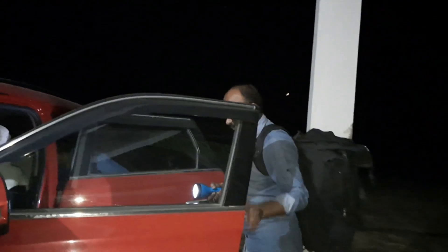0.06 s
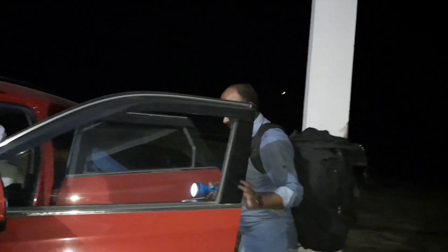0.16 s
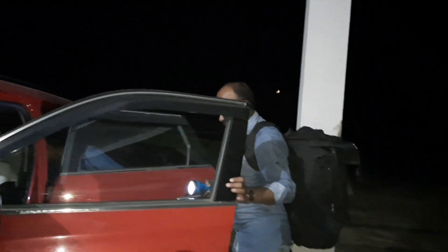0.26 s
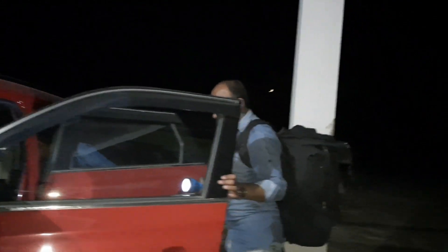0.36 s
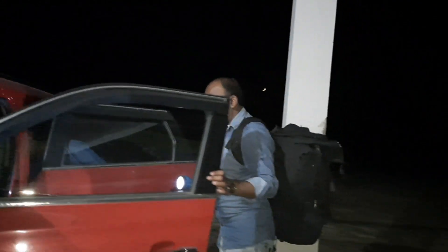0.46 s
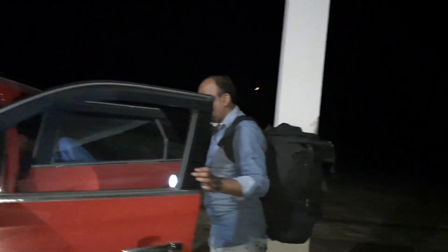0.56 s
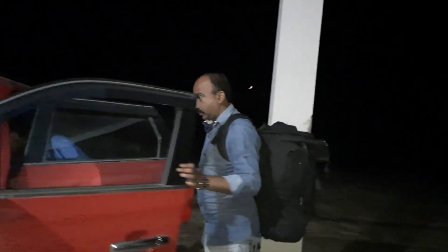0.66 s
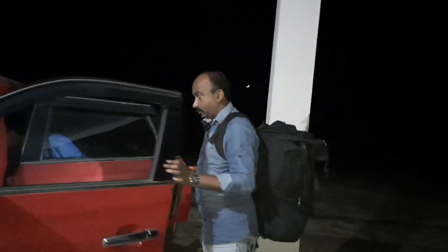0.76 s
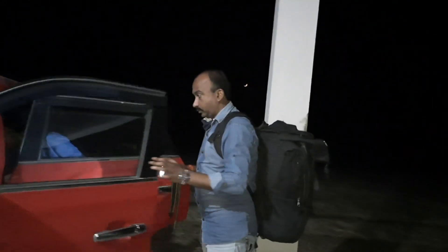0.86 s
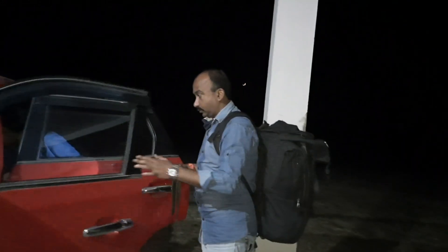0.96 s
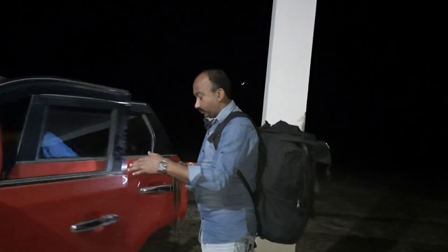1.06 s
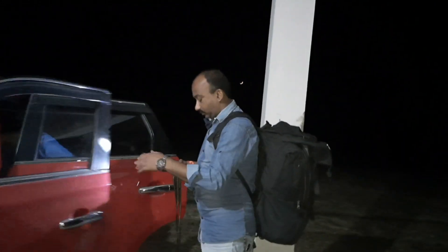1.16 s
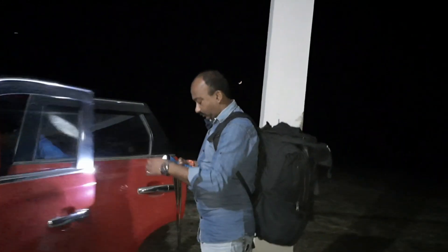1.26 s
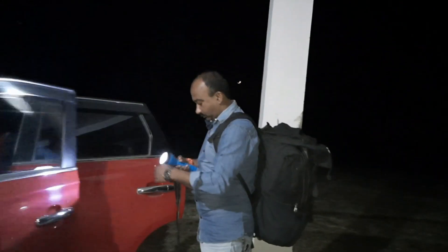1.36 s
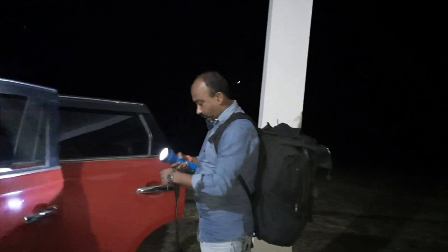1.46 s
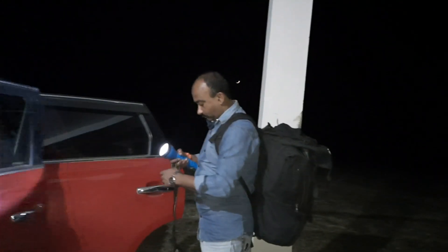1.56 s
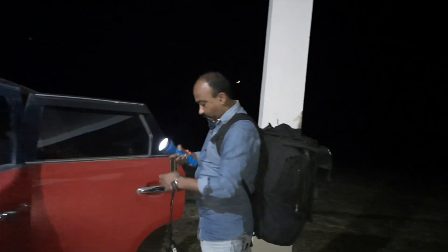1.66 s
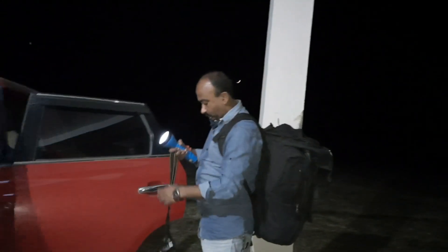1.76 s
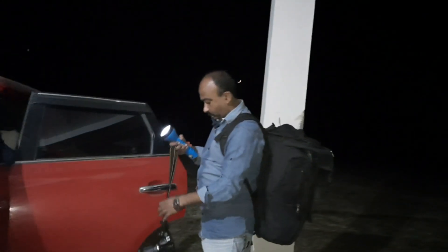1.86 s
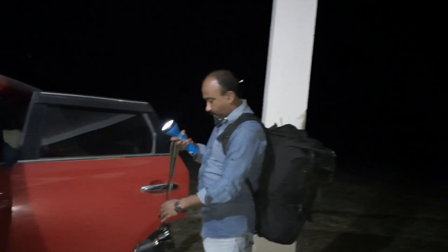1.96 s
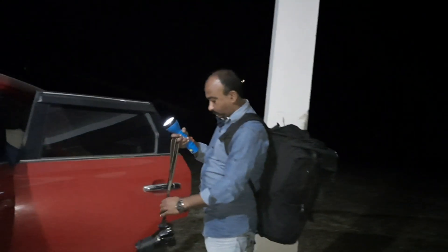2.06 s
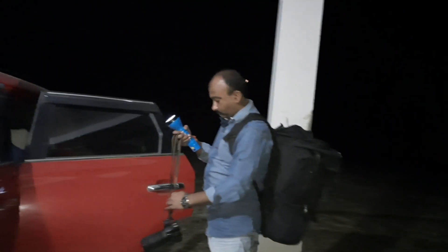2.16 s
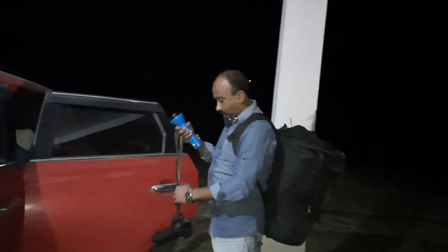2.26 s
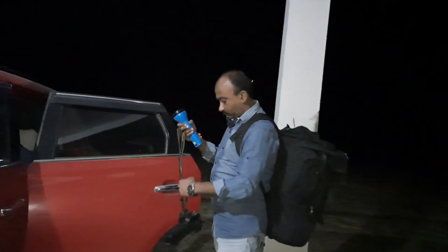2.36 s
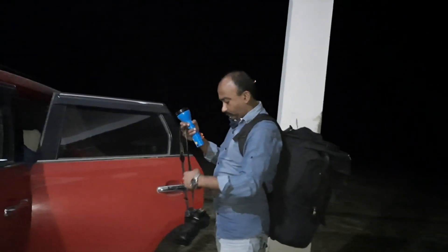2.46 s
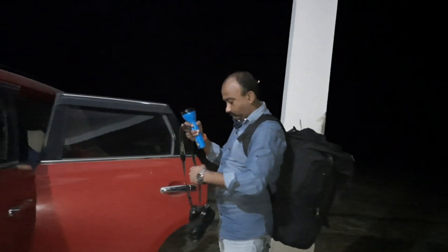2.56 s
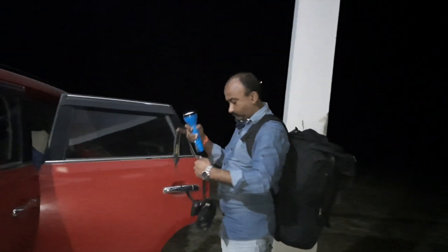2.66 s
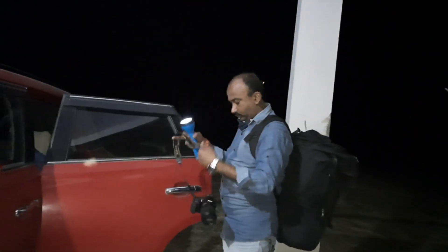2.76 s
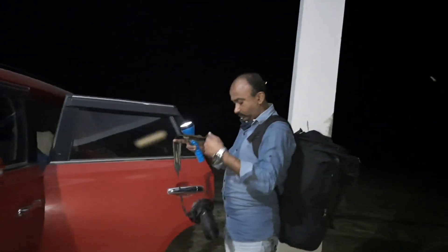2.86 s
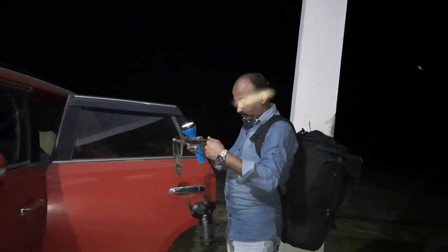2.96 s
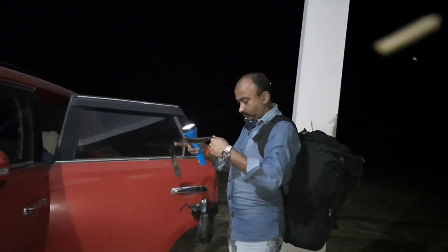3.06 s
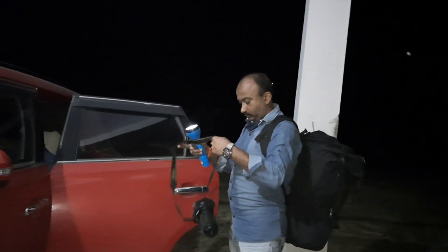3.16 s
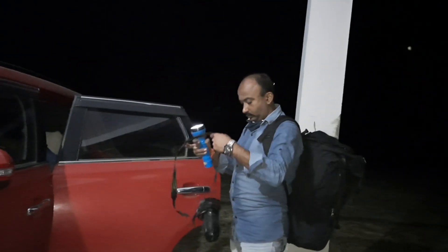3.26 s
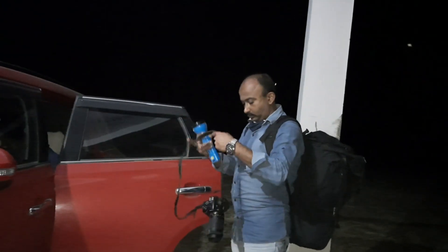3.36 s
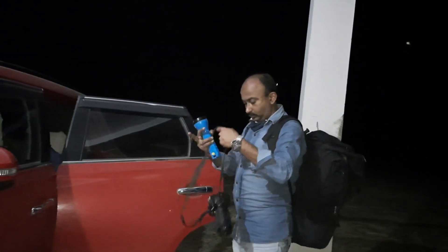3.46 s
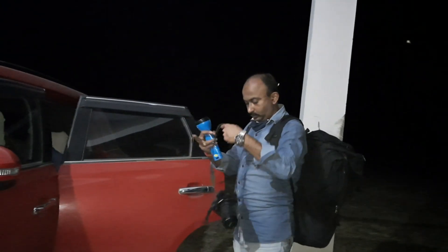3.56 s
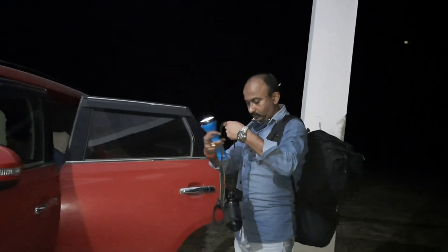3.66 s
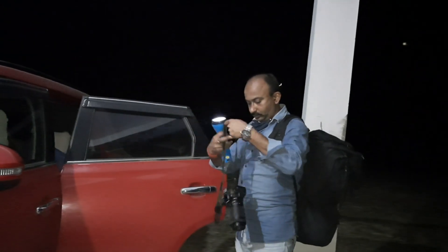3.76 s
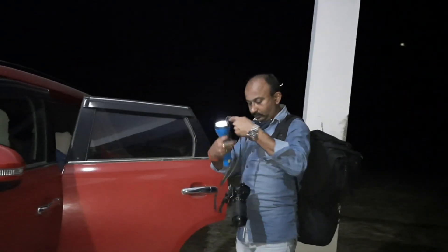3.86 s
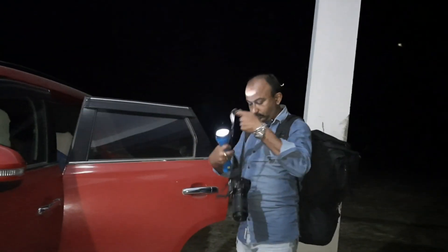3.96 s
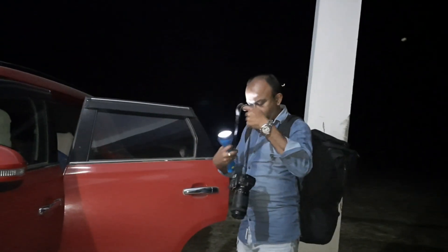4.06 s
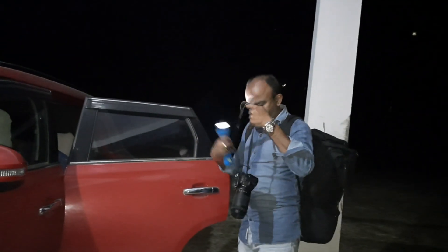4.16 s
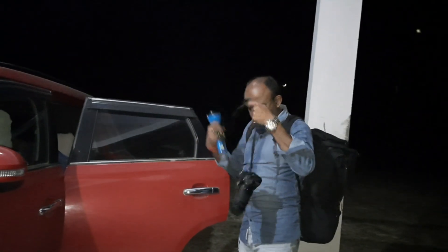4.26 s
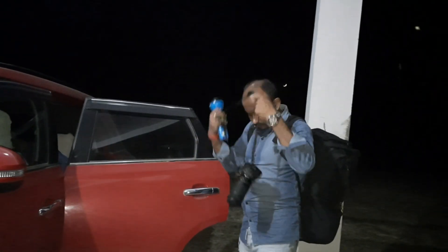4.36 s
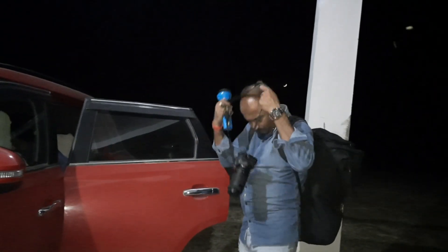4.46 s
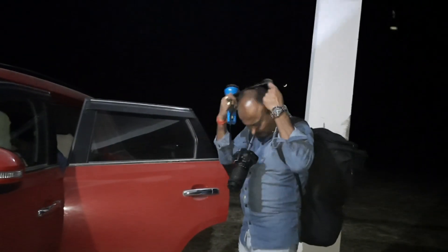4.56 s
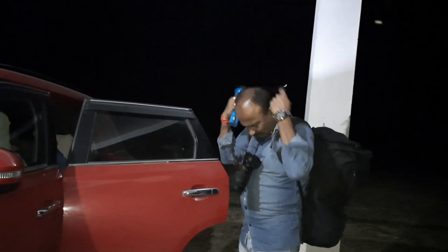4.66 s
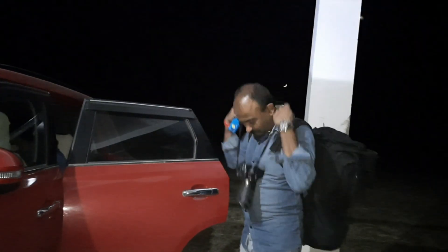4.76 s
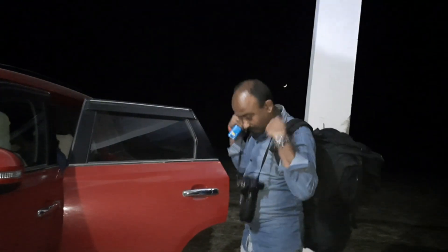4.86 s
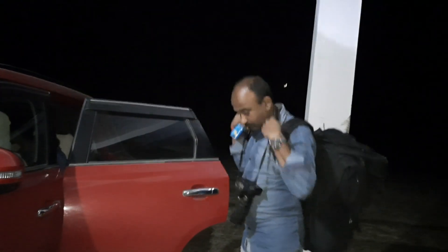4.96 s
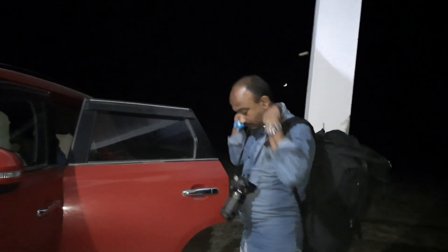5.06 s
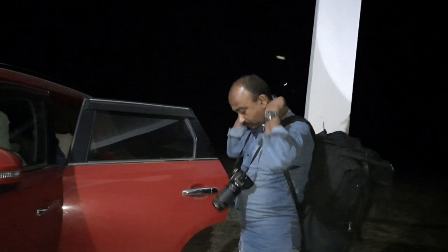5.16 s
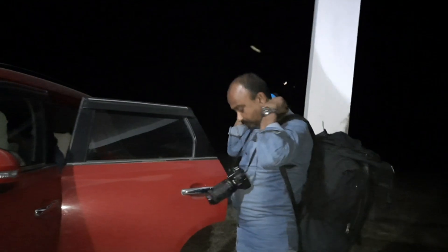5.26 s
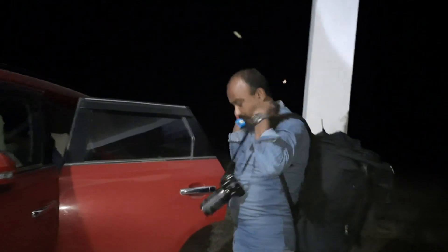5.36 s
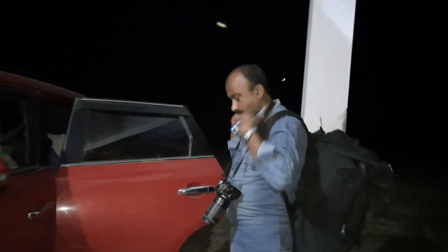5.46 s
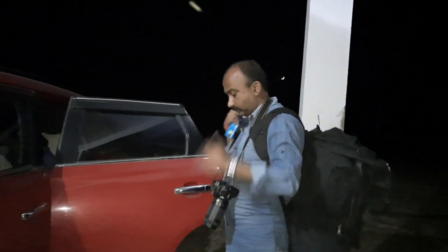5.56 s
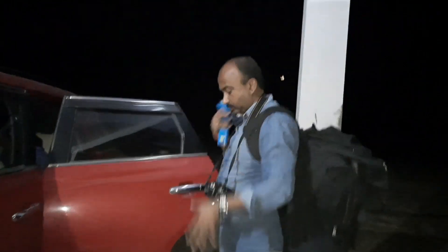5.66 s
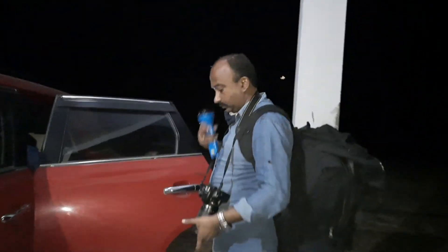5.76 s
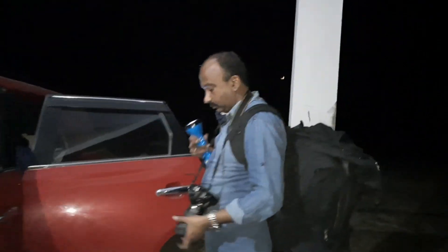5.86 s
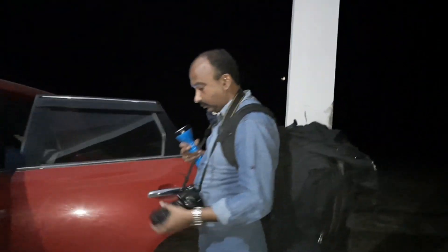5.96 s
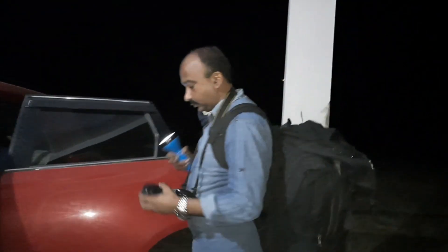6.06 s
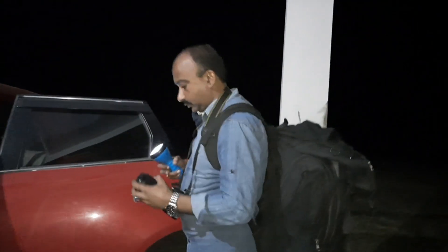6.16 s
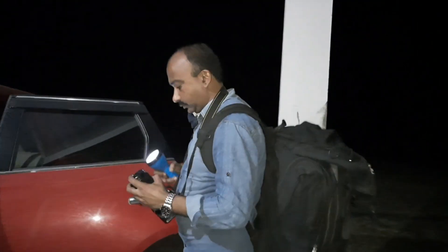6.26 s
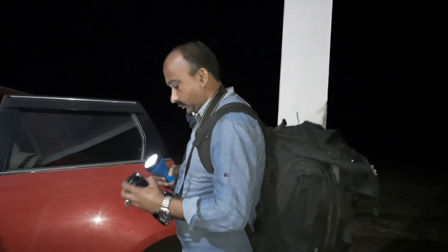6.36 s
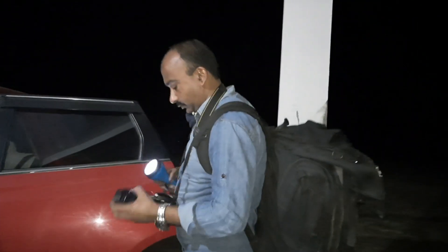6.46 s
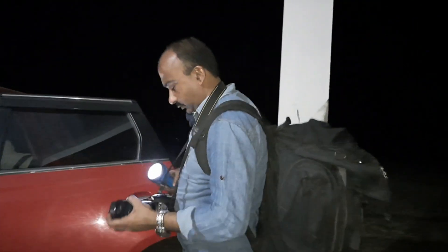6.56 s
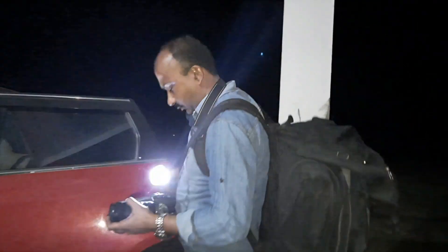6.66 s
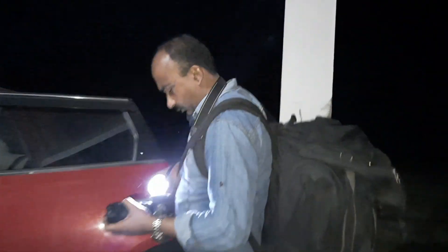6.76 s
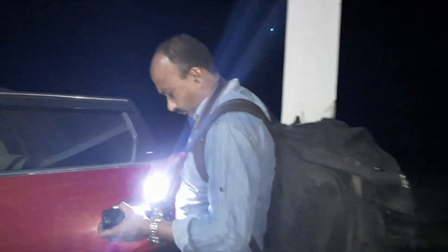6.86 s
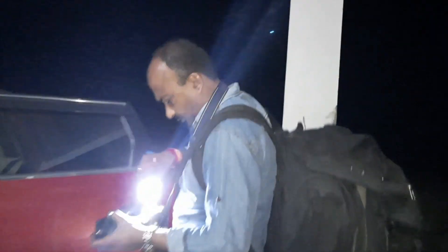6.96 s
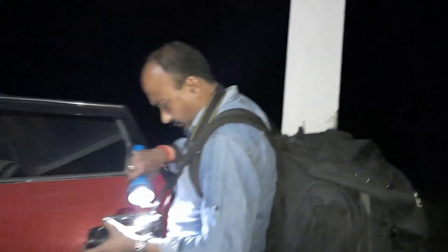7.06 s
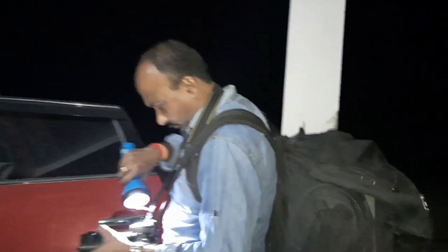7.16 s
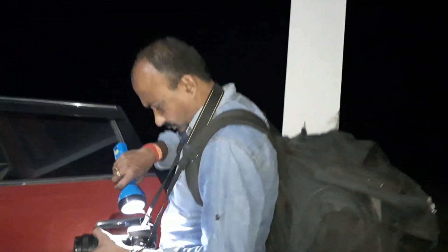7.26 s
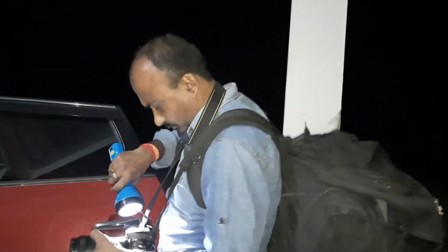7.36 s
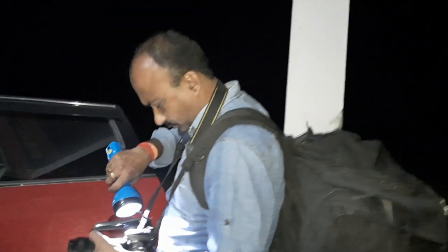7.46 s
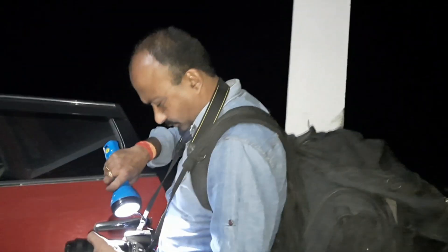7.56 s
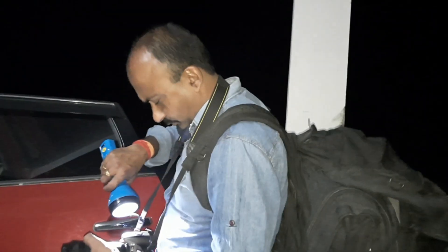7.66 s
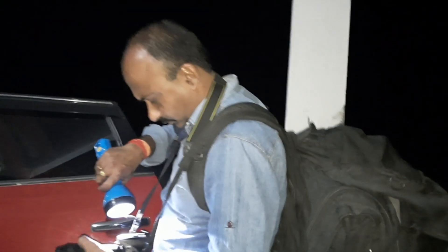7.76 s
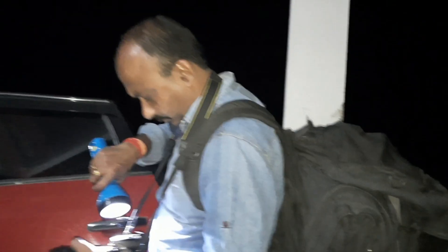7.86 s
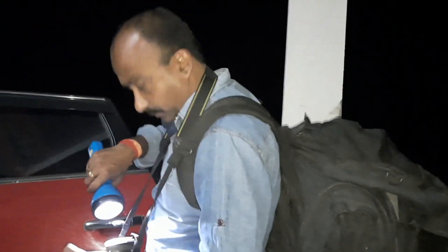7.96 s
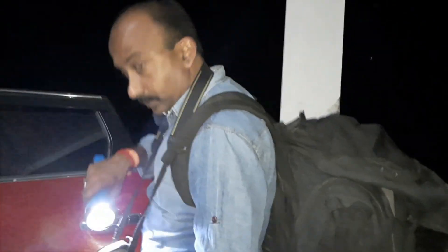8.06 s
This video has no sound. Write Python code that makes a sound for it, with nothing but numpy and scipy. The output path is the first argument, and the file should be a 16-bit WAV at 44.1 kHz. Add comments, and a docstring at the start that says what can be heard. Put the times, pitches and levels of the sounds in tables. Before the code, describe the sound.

Soft padded knocks and light ticks come first over faint high insect chirring. Fabric brushes briefly, then a car door slams far louder than everything else, a deep thump with metal latch clatter, cabin boom and dull distant echoes. Afterward a crisp buckle click stands out, with sparse faint clicks and rustles in the open night. The stereo pickup is close, under a hard reflective roof.

```python
"""Crickets chorus at the edge of a forest by night, and a katydid lisps high above them.
A man bumps a car door, slams it under a hard roof, then hangs a camera round his neck: cloth swishes, buckles click.
Blows on the door are air pulses, noise bursts and decaying modes; clicks are short bursts with a hollow answer.
Cloth and katydid are shaped noise; crickets are pulsed notes over a noise band; echoes are decaying noise."""
import sys
import numpy as np
from scipy import signal
from scipy.fft import rfft, irfft
from scipy.io import wavfile
from scipy.ndimage import uniform_filter1d, minimum_filter1d

SR = 44100
rng = np.random.default_rng(int(sys.argv[2]) if len(sys.argv) > 2 else 0)


def generate_wav(sig):
    """Save sig (samples, or channels by samples) to the path in sys.argv[1] as 16-bit PCM at SR."""
    pcm = np.round(np.clip(np.atleast_2d(sig).T, -1, 1) * 32767).astype(np.int16)
    wavfile.write(sys.argv[1], SR, pcm)


N = 357210


def gain_of(db):
    """Decibels to gain."""
    return 10 ** (np.asarray(db) / 20)


def evened(x):
    """Scales to rms 1."""
    return x / np.sqrt(np.mean(x ** 2) + 1e-20)


def read(points, hz):
    """Interpolates a table along a log-frequency axis."""
    f, value = np.transpose(points)
    return np.interp(np.log(hz + 1), np.log(f + 1), value)


def add(mix, start_s, sound):
    """Mixes a sound in at a start time, cut at the end of the mix."""
    part = mix[:, max(round(start_s * SR), 0):][:, :sound.shape[-1]]
    part += sound[..., :part.shape[1]]


def noise(colour, size, alike=1):
    """Coloured noise of rms 1 at two microphones, most alike in the bass."""
    # left-right likeness of diffuse sound: (frequency [Hz], likeness [0-1], before the alike factor)
    likeness = [(50, 1), (280, .9), (650, .6), (1400, 0.0094), (16000, 0)]
    hz = np.fft.rfftfreq(size, 1 / SR)
    a, b = rfft(rng.standard_normal((2, size)))
    same = np.clip(alike * read(likeness, hz), 0, 1)
    pair = np.array([a, same * a + np.sqrt(1 - same ** 2) * b])
    return evened(irfft(pair * gain_of(read(colour, hz)), size))


def drift(per_s):
    """A random curve of rms 1: 20 sines, the fastest at per_s cycles a second."""
    t = np.arange(0, N, 64) / SR
    rates_hz = np.geomspace(per_s / 10, per_s, 20)[:, None]
    waves = np.sin(2 * np.pi * (rates_hz * t + rng.random((20, 1))))
    return np.interp(np.arange(N) / SR, t, evened(waves.sum(0)))


def burst(colour, t60_s, rise_s=0.00025, size=8192):
    """A blow on a thing with many close modes: noise that rises and dies exponentially."""
    t = np.arange(size) / SR
    return noise(colour, size) * (1 - np.exp(-(t / rise_s) ** 2)) * gain_of(-60 * t / t60_s)


def roof(x, wet_db, gap_s=0.0037, linger=1):
    """Echoes between roof, ground and car: noise whose decay time depends on frequency."""
    # decay of the echoes: (frequency [Hz], t60 [s] at linger 1)
    decay = [(60, 1), (250, 0.77), (1000, .68), (2500, 0.7), (5000, .48), (8000, 0.48), (15000, 0.47)]
    hz, _, spectra = signal.stft(noise([(20, 0), (20000, 0)], SR), SR, nperseg=256)
    t = _
    t60_s = linger * read(decay, hz)[:, None]
    tail = signal.istft(spectra * gain_of(-60 * t / t60_s), SR, nperseg=256)[1]
    # the echoes fade in around the gap
    tail *= np.clip(np.arange(tail.shape[1]) / SR / gap_s - .5, 0, 1)
    wet = signal.fftconvolve(x, tail / np.linalg.norm(tail[0]), axes=1)[:, :N]
    return x + gain_of(wet_db) * wet


def door(thump_s=.0006, panel_t60_s=0.079, latch_t60_s=.05, thump_wet_db=-14, clatter_wet_db=-8.0,
         latch_wet_db=-7, lowest_hz=45, hollow_hz=96, hollow_q=2):
    """Each blow pushes out a pulse of air, notched at hollow_hz, and shakes panel and latch."""
    # door panel: (frequency [Hz], density [dB per Hz])
    panel_colour = [(60, -26), (150, -19), (260, 2.5), (500, -6), (750, -5), (1100, -12), (2000, -13.5),
                    (3000, -23), (5000, -30), (10000, -69.5)]
    # latch metal: (frequency [Hz], density [dB per Hz])
    latch_colour = [(300, -19), (1200, -5.5), (2500, -3.5), (3900, 2), (5500, -8.5), (7600, -6.5),
                    (8900, -29), (11000, -29.5), (16000, -30)]
    thumps, clatter, cracks = np.zeros((3, 2, N))
    t, lead_s = np.arange(2048) / SR, .01
    for s, thump_db, panel_db, latch_db in blows():
        pulse = np.exp(-.5 * ((t - lead_s) / thump_s) ** 2)
        add(thumps, s - lead_s, -gain_of(thump_db) * pulse)
        add(clatter, s, gain_of(panel_db) * burst(panel_colour, panel_t60_s, rise_s=0.0019))
        add(cracks, s, gain_of(latch_db) * burst(latch_colour, latch_t60_s))
    thumps = signal.sosfilt(signal.butter(2, lowest_hz, "high", fs=SR, output="sos"), thumps)
    thumps = signal.lfilter(*signal.iirnotch(hollow_hz, hollow_q, SR), thumps)
    near = roof(thumps, thump_wet_db) + roof(clatter, clatter_wet_db) + roof(cracks, latch_wet_db)
    return near + far_echoes(thumps + clatter + cracks)


def blows(judder_panel_db=-15, panel_fall_db_per_s=179.5, judder_latch_db=-29, latch_fall_db_per_s=290):
    """The door meets seal, latch and frame, then judders on its seal while panel and latch rattle ever less."""
    # door closing: (time [s], air thump [dB], panel clatter [dB], latch crack [dB])
    closing = [(1.8315, -28, -29.5, -61.5), (1.840, -30, -29, -57.5), (1.8537, -34.5, -21.5, -20.5),
               (1.8603, -7, -7.5, -21.5), (1.867, -2, -9, -26), (1.8702, -29, -15.5, -17)]
    # latched door against its seal: (time [s], air thump [dB])
    judders = [(1.876, -10.5), (1.8982, -5), (1.9048, -8), (1.922, -4.5), (1.9474, -10), (1.9554, -12)]
    every_blow = list(closing)
    for s, thump_db in judders:
        since_s = s - judders[0][0]
        panel_db = judder_panel_db - panel_fall_db_per_s * since_s
        latch_db = judder_latch_db - latch_fall_db_per_s * since_s
        every_blow.append((s, thump_db, panel_db, latch_db))
    return every_blow


def far_echoes(x, dull_hz=500):
    """The slam returns from far walls, dull and smeared."""
    # far walls: (delay [s], level [dB])
    returns = [(.245, -28), (.385, -36)]
    out = np.zeros((2, N))
    dull = signal.sosfilt(signal.butter(2, dull_hz, fs=SR, output="sos"), x)
    for delay_s, db in returns:
        add(out, delay_s, gain_of(db) * dull)
    return roof(out, wet_db=-4.5, linger=0.34)


def car_body(start_s=1.861, level_db=-18, rise_s=.004, longest_t60_s=.56):
    """The shut door sets skin and cabin booming; the rubber seals cap how long any mode rings."""
    # door skin and cabin: (frequency [Hz], level [dB] before level_db, t60 [s] before the cap)
    modes = [(42, -3, .55), (49.7, -5, .64), (59.2, 2.5, 0.71), (131, -1.5, 0.44), (188.5, -4, .42),
             (207.6, -3, .4), (229, 1, 0.47), (247, 4, 0.65), (268.3, -3.5, 0.36), (316.25, -4, 0.26),
             (377.7, -13, .6), (435.5, -4, 1), (482.3, -9.5, 0.72), (506, -12.5, .6), (550, -17, 0.5),
             (720, -1, .27), (795.2, -10, 0.18), (890, -11.5, 0.46), (960, -19, .35), (1206, -15.5, .42),
             (1390, -18, .42), (1453, -17.5, 0.37), (1730, -19, 0.32), (2295, -20, .35), (3560, -17, 0.11)]
    out, t = np.zeros((2, N)), np.arange(SR) / SR
    ring = np.zeros(SR)
    for hz, db, t60_s in modes:
        ring += gain_of(db - 60 * t / min(t60_s, longest_t60_s)) * np.sin(2 * np.pi * hz * t)
    add(out, start_s, gain_of(level_db) * (1 - np.exp(-t / rise_s)) * ring)
    return out


def buckles(count=3, bounce_s=.0034, bounce_share=.8, bounce_loss_db=5.5, snap_rise_s=0.00045,
            graze_rise_s=0.0034, graze_t60_s=0.052, wet_db=0):
    """Snaps bounce, ever sooner and weaker; grazes touch once and softly."""
    # buckle on torch or camera: (time [s], bright tick [dB], tick t60 [s], hollow case [dB], left minus right [dB])
    snaps = [(2.8138, -13.5, 0.0091, -32, 2), (3.6598, -44.5, 0.0073, -72, 5.5),
             (5.9973, -32, 0.021, -35.5, -1)]
    # handle, strap fittings and torch: (time [s], bright tick [dB], hollow case [dB], left minus right [dB])
    grazes = [(0.053, -47, -76, 5), (.392, -49.5, -56.5, 5), (1.088, -54, -52.5, 2), (1.125, -70, -53, 5),
              (2.746, -54, -72, 12), (2.958, -40.5, -83, 1), (2.997, -40.5, -78, 0),
              (3.021, -40.5, -78, -1), (4.9371, -43.5, -64, 1), (5.481, -44, -55, 3), (5.59, -62, -56, 0),
              (5.625, -66, -56, 0), (7.63, -65, -56, 0)]
    out = np.zeros((2, N))
    for s, tick_db, tick_t60_s, case_db, pan_db in snaps:
        for k in range(count):
            touch = click(tick_db, tick_t60_s, snap_rise_s, case_db, pan_db)
            add(out, s, gain_of(-k * bounce_loss_db) * touch)
            s += bounce_s * bounce_share ** k
    for s, tick_db, case_db, pan_db in grazes:
        add(out, s, click(tick_db, graze_t60_s, graze_rise_s, case_db, pan_db))
    return roof(out, wet_db, linger=0.645)


def click(tick_db, tick_t60_s, rise_s, case_db, pan_db, case_t60_s=0.027, case_rise_s=0.0023):
    """A hard little part ticks, and the hollow case it hits answers."""
    # hard little part: (frequency [Hz], density [dB per Hz])
    tick_colour = [(200, -36), (700, -52), (2400, -11.5), (4000, -4), (6000, 0.5), (7500, 6.5), (8900, -15),
                   (11000, -10.5), (14000, -12.5), (16000, -9)]
    # hollow case: (frequency [Hz], density [dB per Hz])
    case_colour = [(150, -23), (400, -18), (650, -5), (1400, -3), (2200, 4), (3500, -5.5), (7000, -29),
                   (10000, -45)]
    tick = gain_of(tick_db) * burst(tick_colour, tick_t60_s, rise_s)
    answer = gain_of(case_db) * burst(case_colour, case_t60_s, case_rise_s)
    return (tick + answer) * gain_of([[pan_db / 2], [-pan_db / 2]])


def clothes(grain_db=1.5, wet_db=-6, hollow_hz=2380, hollow_q=4, hollow_db=3.0, bite=0.32, patchy_db=2):
    """Woven cloth catches and slips thread by thread; hard rubbing adds a hollow rasp that lingers."""
    # woven cloth: (frequency [Hz], density [dB per Hz])
    cloth_colour = [(100, -21), (600, -10), (1400, -7.5), (2350, -6), (3500, -6.5), (5200, -2.5),
                    (7600, -2), (8900, -13.5), (11000, -19.5), (13300, -11), (16000, -13.5)]
    level_db = rubbing_db()
    swish = noise(cloth_colour, N) * gain_of(level_db + grain_db * drift(per_s=600))
    rasp_db = hollow_db + level_db + bite * (level_db - level_db.max()) + patchy_db * drift(per_s=34)
    hollow = signal.iirpeak(hollow_hz, hollow_q, SR)
    rasp = signal.lfilter(*hollow, noise(cloth_colour, N) * gain_of(rasp_db))
    return roof(swish, wet_db, linger=0.34) + roof(rasp, wet_db=-1.5, linger=0.64)


def rubbing_db(rest_db=-78, skew=1.15, speed_power=1.05):
    """Friction follows the hand's speed: one leaning arch a stroke, over the stir of clothes at rest."""
    # sleeves, strap and pack sliding: (start [s], length [s], level [dB])
    slides = [(0.095, 0.1, -58.5), (0.3, 0.16, -69), (1.073, 0.048, -57.5), (1.346, .255, -40),
              (1.695, 0.2, -57.5), (3.896, .16, -66.5), (4.227, 0.093, -63.5), (4.42, 0.26, -67.5),
              (4.746, 0.22, -64.5), (5.015, 0.25, -66.5), (5.382, 0.2, -58), (5.471, 0.04, -56),
              (5.562, 0.095, -58), (5.854, 0.2, -71)]
    force = np.full((1, N), gain_of(rest_db))
    for s, length_s, db in slides:
        along = np.arange(0, length_s, 1 / SR) / length_s
        add(force, s, gain_of(db) * abs(np.sin(np.pi * along ** skew)) ** speed_power)
    return 20 * np.log10(force[0])


def bumps(wet_db=-10, tone_db=-1, full_boom_hz=132):
    """Padded knocks swell and fade, a dull puff around one boom; higher booms are fainter."""
    # padded knock: (multiple of its boom frequency [ratio], density [dB per Hz])
    knock_colour = [(.2, -28), (.6, -15), (.85, -5), (1, 4), (1.2, -5), (1.9, -6), (3.3, -12), (4.5, -25),
                    (14, -35), (55, -50)]
    # hand, hip and shoes: (time [s], level [dB], boom [Hz], time to peak [s])
    knocks = [(.002, -57, 260, 0.01), (.022, -46, 126.6, 0.031), (.094, -48.5, 150, 0.016),
              (0.108, -58.5, 280, .014), (0.357, -55, 280, 0.0079), (0.385, -49, 273, .0095),
              (0.652, -61, 248, 0.021), (0.936, -64, 326, 0.024), (1.072, -54.5, 380, .015),
              (1.129, -55, 301, .014), (5.581, -56.5, 884, 0.028), (6.001, -52.5, 270, 0.0095),
              (7.378, -50.5, 226, 0.015), (7.629, -59, 515, 0.0036)]
    puffs, booms = np.zeros((2, 2, N))
    t = np.arange(16384) / SR
    for s, db, boom_hz, peak_s in knocks:
        swell = gain_of(db) * t / peak_s * np.exp(1 - t / peak_s)
        add(puffs, s, swell * noise(np.array(knock_colour) * [boom_hz, 1], len(t)))
        add(booms, s, swell * np.sin(2 * np.pi * boom_hz * t) * (full_boom_hz / boom_hz) ** 2)
    return roof(puffs, wet_db, linger=.65) + gain_of(tone_db) * booms


def pings():
    """The door's skin and a metal ring on the strap each sound a single note that dies away."""
    # ringing parts: (time [s], frequency [Hz], level [dB], t60 [s])
    notes = [(1.101, 785.8, -57, 0.39), (4.938, 7250, -41.5, 0.045)]
    out, t = np.zeros((2, N)), np.arange(16384) / SR
    for s, hz, db, t60_s in notes:
        add(out, s, gain_of(db - 60 * t / t60_s) * np.sin(2 * np.pi * hz * t))
    return roof(out, wet_db=-13)


def katydid(lisps_per_s=9.45, soft_start_db=-7.5, rise_s=0.0011, length_s=0.055, flutter_db=1.4, wet_db=-5):
    """Each wing stroke rasps a very high hiss; the strokes come evenly and grow from a bout's soft start."""
    # singing bouts: (first stroke [s], last stroke [s], full level [dB], swell [s])
    bouts = [(0.05, 1.02, -59, .7), (5.355, 5.57, -59, .25), (6.795, 7.218, -74, .05),
             (7.341, 8.068, -59, .17)]
    rasp = [(6000, -49), (9500, -19), (11500, -13.5), (13300, -0.5), (15000, 3), (16000, -2)]  # (Hz, dB per Hz)
    out, t = np.zeros((2, N)), np.arange(8192) / SR
    stroke = (1 - np.exp(-t / rise_s)) * np.exp(-(t / length_s) ** 2)
    for first_s, last_s, full_db, swell_s in bouts:
        count = round((last_s - first_s) * lisps_per_s) + 1
        for s in np.linspace(first_s, last_s, count):
            db = full_db + soft_start_db * max(1 - (s - first_s) / swell_s, 0)
            add(out, s, gain_of(db) * noise(rasp, len(t)) * stroke)
    return roof(out * gain_of(flutter_db * drift(per_s=200)), wet_db)


def near_chirps(strokes_per_s=55, wet_db=1, waver_hz=30):
    """Nearer insects: short trills, each on one wavering note, stand out of the chorus."""
    # trills: (start [s], length [s], mean note [Hz], level [dB])
    trills = [(2.199, 0.13, 5160, -57.5), (3.22, 0.18, 5170, -63.5), (4.058, 0.073, 5070, -57.5),
              (5.001, 0.15, 5065, -59), (6.8, 0.43, 5480, -64), (7.22, 0.13, 5220, -61.5),
              (7.88, 0.11, 5120, -63), (7.326, 0.085, 13250, -63.5), (7.407, 0.031, 13230, -51.5)]
    out = np.zeros((2, N))
    for s, length_s, hz, db in trills:
        t = np.arange(0, length_s, 1 / SR)
        turns = np.cumsum(hz + waver_hz * drift(per_s=143)[:len(t)]) / SR
        strokes = abs(np.sin(np.pi * strokes_per_s * t))
        swell = np.sin(np.pi * t / length_s)
        add(out, s, gain_of(db) * swell * strokes * np.sin(2 * np.pi * turns))
    return roof(out, wet_db)


def crickets(count=28, pitch_hz=5520, spread_hz=400, near_db=-66.5, far_db=1, swell_db=1.66):
    """Each cricket scrapes pulses of its own note, in chirps; those further off blur into a noise band."""
    # far crickets' band: (frequency [Hz], density [dB per Hz])
    band_colour = [(4000, -43), (4600, -18.5), (4850, -2.5), (5500, -4.5), (6000, -4.5), (6500, -8.5),
                   (7300, -6), (7800, -13.5), (8700, -40)]
    # far crickets' strength: (time [s], level [dB] before far_db and swell)
    singing = [(0.0, -61), (0.81, -65.5), (1.96, -61), (2.57, -71), (2.86, -64.5), (5.68, -64),
               (6.52, -67.5), (7.06, -65), (8.1, -68.5)]
    t, out = np.arange(N) / SR, np.zeros((2, N))
    for note, (stroke, chirp, start, side) in zip(np.linspace(-1, 1, count), rng.random((count, 4))):
        strokes = np.maximum(np.sin(2 * np.pi * (30 + 40 * stroke) * t), 0)
        chirps = np.maximum(np.sin(2 * np.pi * ((1 + 3 * chirp) * t + start)) + .5, 0)
        # the note bends within every stroke of the wing
        tone = np.sin(2 * np.pi * (pitch_hz + spread_hz * note) * t + 2 * strokes)
        out += np.sqrt([[side], [1 - side]]) * strokes * chirps * tone
    band_db = far_db + np.interp(t, *np.transpose(singing)) + swell_db * drift(per_s=11)
    far = gain_of(band_db) * noise(band_colour, N)
    return gain_of(near_db) * evened(roof(out, wet_db=12.0)) + far


def night_air(level_db=-66, swell_db=-0.18):
    """Far rumble and a fine hiss: coloured noise, its level drifting slightly."""
    # night air: (frequency [Hz], density [dB per Hz])
    air_colour = [(20, -15), (55, 2.5), (130, -4), (260, -1.5), (500, -8.5), (1000, -13), (1700, -15.5),
                  (2400, -14), (3400, -21), (6000, -15), (7400, -13), (9200, -32), (13500, -23.5),
                  (16000, -20.5)]
    return noise(air_colour, N, alike=0.66) * gain_of(level_db + swell_db * drift(per_s=11))


def scene():
    """The man and his car in front of the insects."""
    man_and_car = door() + car_body() + buckles() + clothes() + bumps() + pings()
    return man_and_car + katydid() + near_chirps() + crickets() + night_air()


def record(dry, low_cut_hz=35, edge_hz=15850, ceiling=.93):
    """Two microphones of unequal response lose the deepest bass; a limiter holds peaks; then the band limit."""
    # microphone imbalance: (frequency [Hz], left minus right [dB])
    imbalance = [(60, 5), (200, 5), (700, 3.5), (1300, 3), (2400, 1.5), (4400, 0), (5800, 0.5), (8000, 11),
                 (11000, -6.5), (15000, -1.5)]
    lean_db = read(imbalance, np.fft.rfftfreq(N, 1 / SR))
    heard = irfft(rfft(dry) * gain_of([lean_db / 2, -lean_db / 2]), N)
    heard = signal.sosfilt(signal.butter(4, low_cut_hz, "high", fs=SR, output="sos"), heard)
    allowed = 1 / np.maximum(abs(heard).max(0) / ceiling, 1)
    heard = heard * uniform_filter1d(minimum_filter1d(allowed, size=129), size=129)
    band_limit = signal.firwin(511, edge_hz, window=("kaiser", 9), fs=SR)
    return signal.oaconvolve(heard, band_limit[None], "same")


dry = scene()
out = record(dry)
generate_wav(out)
```